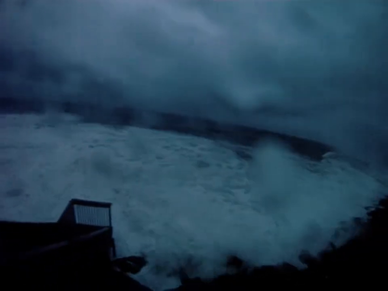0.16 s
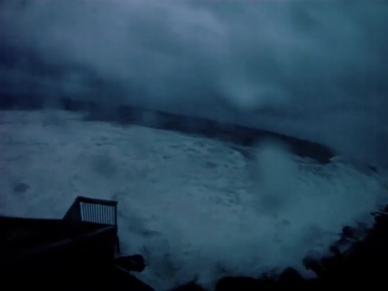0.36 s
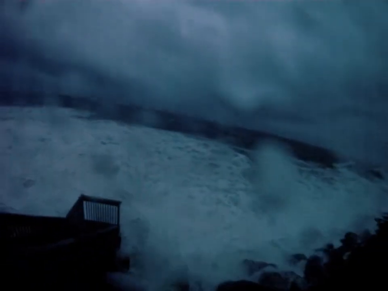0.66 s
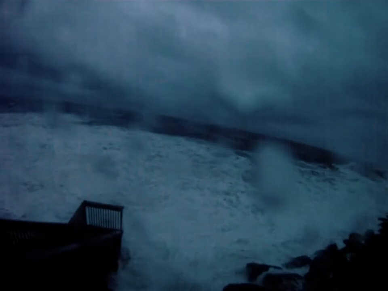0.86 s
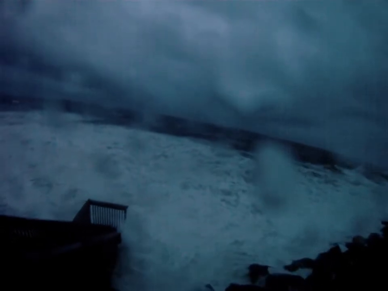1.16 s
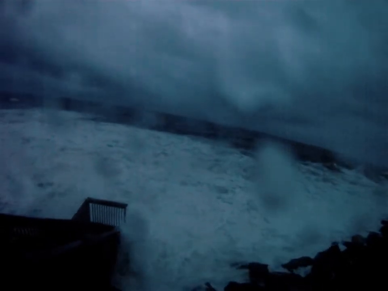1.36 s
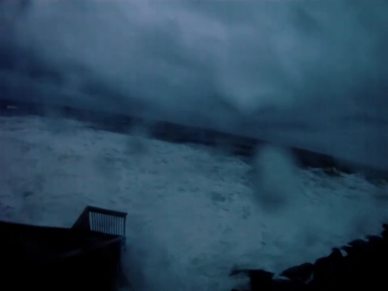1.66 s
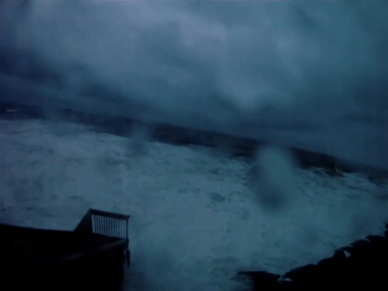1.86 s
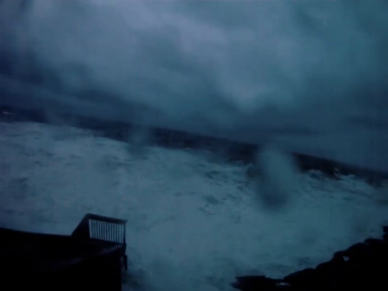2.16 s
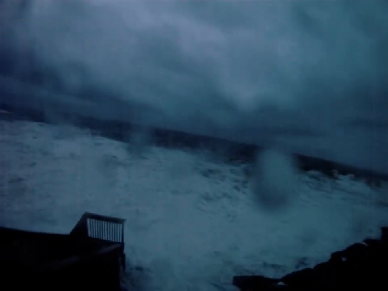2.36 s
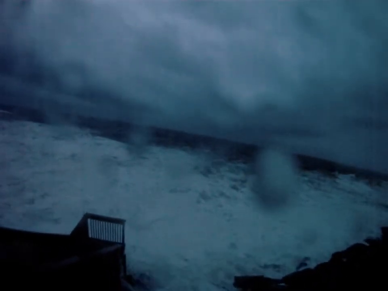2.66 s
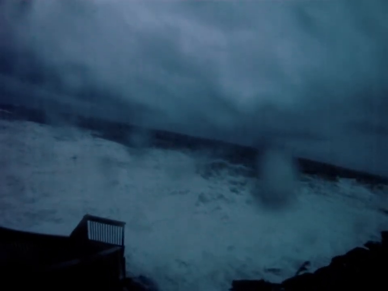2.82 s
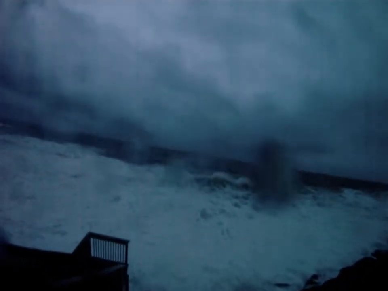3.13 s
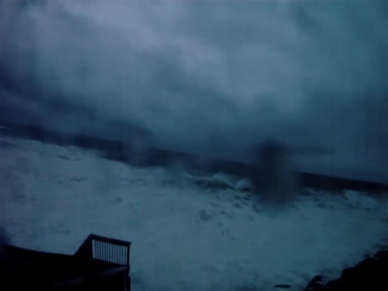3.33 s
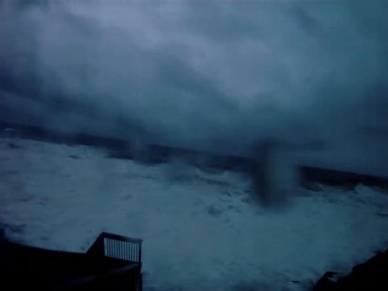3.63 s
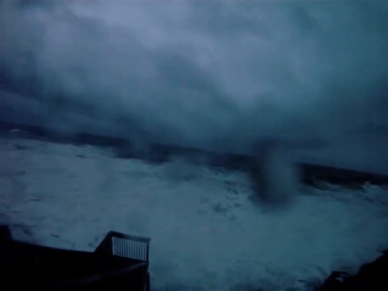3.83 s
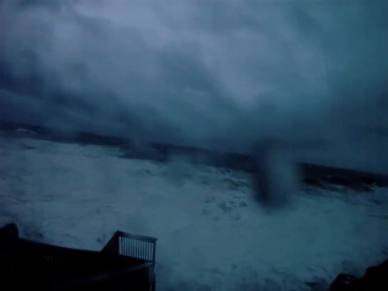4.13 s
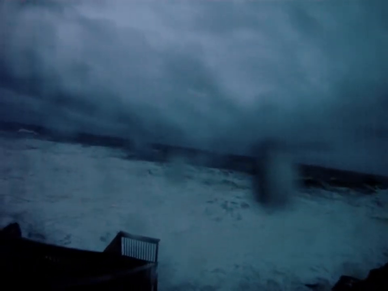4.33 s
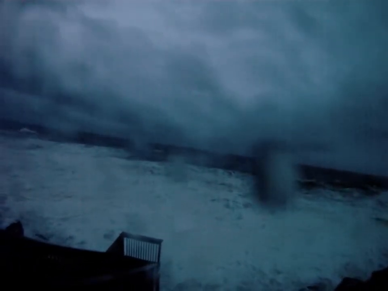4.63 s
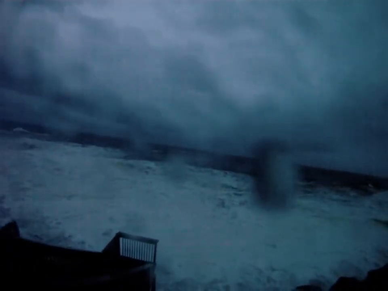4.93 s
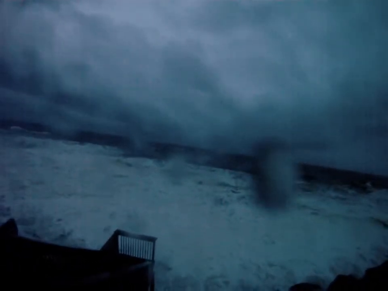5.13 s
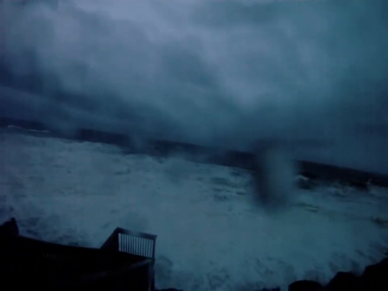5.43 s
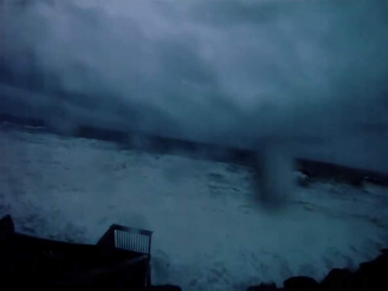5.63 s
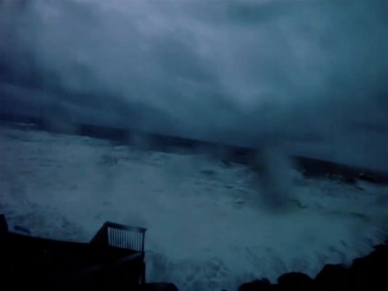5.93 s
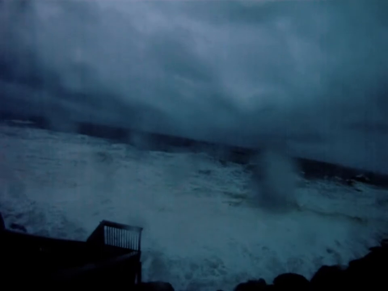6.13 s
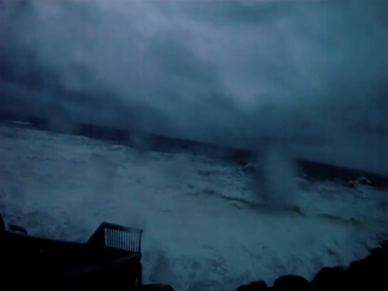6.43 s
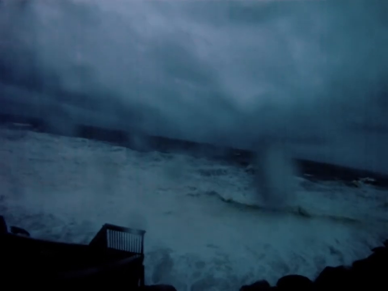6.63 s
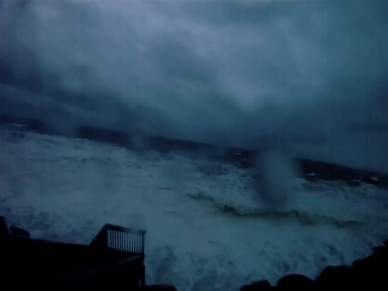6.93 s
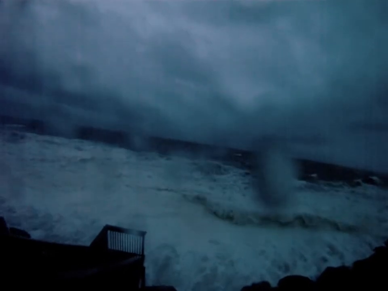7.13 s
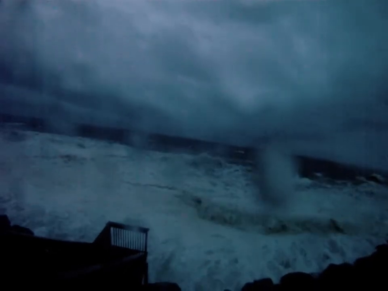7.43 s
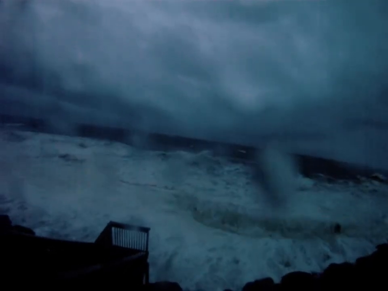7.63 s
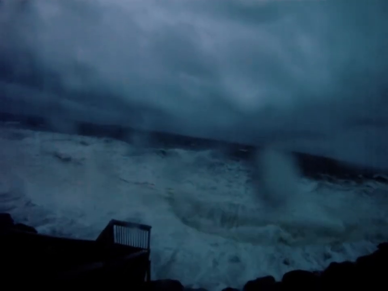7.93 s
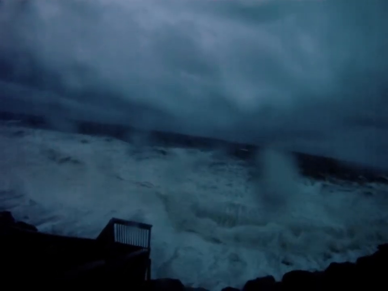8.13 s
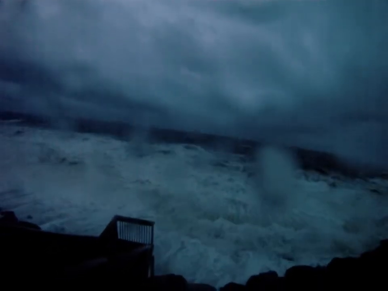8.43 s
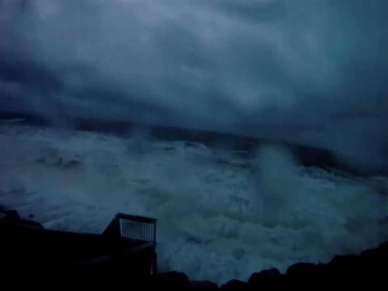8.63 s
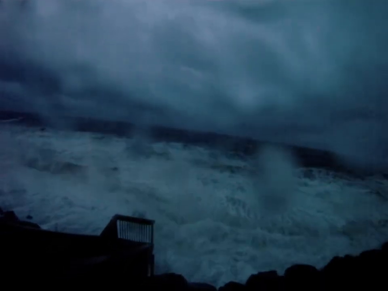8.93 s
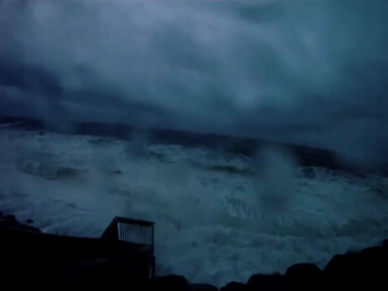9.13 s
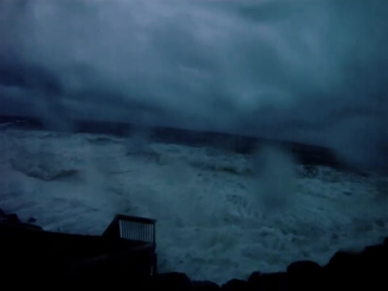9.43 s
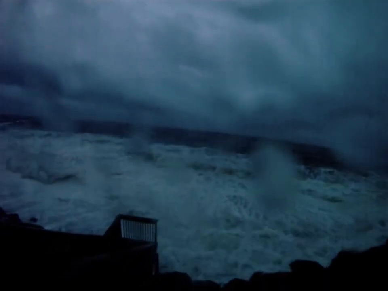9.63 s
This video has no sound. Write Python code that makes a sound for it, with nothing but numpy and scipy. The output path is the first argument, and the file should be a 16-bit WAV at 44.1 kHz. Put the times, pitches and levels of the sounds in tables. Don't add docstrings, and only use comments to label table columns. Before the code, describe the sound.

A stormy sea breaks on a rocky seawall, heard through a small sealed plastic case. A continuous dull water roar, low fluttering wind rumble and steady hissing spray begin fairly strong, ease after about 0.4 seconds, then fluctuate gently. Close drops tick irregularly on the shell throughout, mixing tiny clicks with hard hollow knocks. Strong hits come near 0.3, 1.45 and 1.9 seconds; around 2.3 to 2.9 only faint ticks remain. Knocks return from 3.2, with a heavy double hit near 4.6. The bed dips around 5.3 and swells near 6, with wind thumps around 5.8 to 6. Further knocks land around 6.5 and 7.1, then powerfully near 7.9, 8.2, 8.7, 9.2 and 9.5. Surf and spray surge from about 8.9 and stay stronger to the end. The sound is dry, boxy, nearly mono, with gritty, limited treble and slight overload on heavy drops.

```python
import sys
import numpy as np
from scipy import signal
from scipy.fft import rfft, irfft
from scipy.io import wavfile
from scipy.ndimage import uniform_filter1d, minimum_filter1d

SR = 44100
rng = np.random.default_rng(int(sys.argv[2]) if len(sys.argv) > 2 else 0)


def store_wav(level_fs):
    pcm = np.round(np.clip(np.atleast_2d(level_fs), -1, 1) * 32767)
    wavfile.write(sys.argv[1], SR, pcm.T.astype(np.int16))


def gain_from_db(level_db):
    decades = np.asarray(level_db, float) / 20
    return 10 ** decades


N = 430857

# (time [s], level [dB])
STORM_STRENGTH = [(0.0, -44), (0.25, -45.5), (0.4, -50), (1.5, -47), (1.8, -50.5), (2.6, -50.5), (3.0, -47),
                  (3.5, -50.0), (4.4, -50.5), (4.9, -49.5), (5.3, -53.5), (6.0, -45.5), (6.4, -47),
                  (7.1, -49), (8.2, -47.0), (8.78, -48.5), (8.88, -42.0), (9.77, -44)]
# (time [s], change [dB], spread
# [s])
STORM_SURGES = [(0.74, 4.5, 0.037), (0.87, 2.0, 0.028), (1.0, -3.0, 0.031), (1.22, -2, 0.054),
                (1.63, 0.5, 0.035), (1.75, -2.5, 0.052), (1.91, 4, 0.025), (2.02, -3, 0.018),
                (2.19, -4, 0.031), (2.29, 3, 0.055), (3.3, -2.0, 0.029), (3.68, -2, 0.019),
                (3.92, 1.5, 0.09), (4.41, -2, 0.053), (4.59, -1.5, 0.025), (5.13, -1.5, 0.06),
                (5.29, 1.5, 0.023), (5.9, -3, 0.035), (6.02, 3.5, 0.023), (6.26, -2.5, 0.025),
                (6.85, 1, 0.018), (6.99, -2, 0.048), (7.42, -2.0, 0.015), (7.7, 3.5, 0.022),
                (7.99, -0.5, 0.088), (8.21, 4.5, 0.03), (8.45, -0.5, 0.052), (8.65, 4.5, 0.031),
                (8.89, 3, 0.033), (9.06, -3, 0.025)]
# (time [s], change [dB], spread [s])
WIND_BUFFETS = [(0.34, -3.5, 0.024), (0.61, -2, 0.022), (0.7, 4, 0.018), (1.13, 3.5, 0.059),
                (1.5, 3.0, 0.11), (1.79, -4.0, 0.022), (1.98, 2.5, 0.054), (2.46, -1.5, 0.06),
                (2.8, -3.0, 0.025), (3.61, 2.5, 0.06), (3.89, -3.5, 0.04), (4.09, -3.5, 0.02),
                (5.08, -1.5, 0.09), (5.22, -3, 0.025), (5.78, 5, 0.031), (5.99, 3, 0.045),
                (6.2, 2.5, 0.023), (6.49, -2, 0.1), (6.69, 3.5, 0.023), (6.93, 2.5, 0.044),
                (7.33, 3.5, 0.021), (7.69, 2, 0.021), (7.79, -5.5, 0.036), (7.92, -5, 0.019),
                (8.27, 0, 0.019), (8.54, 2, 0.022), (8.66, -2.5, 0.055), (9.17, -3, 0.18),
                (9.37, -2.5, 0.04), (9.57, 2, 0.04)]
# (frequency [Hz], level [dB])
WIND_COLOUR = [(8.8, -35), (15, -2.5), (80, 1.5), (400, -19), (520, -26.5), (880, -120)]
# (frequency [Hz], level [dB])
SURF_COLOUR = [(150, -1), (250, -3), (400, -6.5), (600, -5.5), (900, -13), (1500, -18), (3000, -17),
               (5500, -19)]
# (frequency [Hz], width [Hz], level [dB])
WALL_MODES = [(1190, 330, -3.5), (2164, 336, -0.5), (2550, 336, -1), (3683, 230, 3.5), (4390, 126, -1),
              (4660, 350, -3.5), (5416, 800, -10.5)]
# (frequency [Hz], width [Hz], level [dB])
DROP_FAMILIES = [
    [(820, 320, -7), (1272, 410, 8)],
    [(2158, 556, 4.5), (2400, 200, -0.5)],
    [(2785, 440, 5), (3330, 140, 1.5)],
    [(3654, 275, 0.5), (4065, 540, -7)],
    [(4640, 180, 2), (5160, 820, -1)],
]
# (frequency [Hz], width [Hz], level [dB])
CASE_THUD = [(251, 310, 2.5), (480, 410, 6)]
# (share of brightness [ratio], share of lean [ratio], offset [dB])
UPPER_RESPONSE = [(.85, 0.84, 0.3), (.85, -0.84, 0.6), (1.3, 0.0018, -1.7)]
# (time [s], main modes [dB], low knock [dB], brightness [dB], lean to upper main modes [dB])
HEAVY_DROPS = [(0.0707,-34.5,-19,3,-4.5),(0.2744,-14.5,-15,-12.5,2),(0.739,-27,-20,5.5,-0.5),(1.4499,-28,-3.5,-25,-5),(1.9281,-18,-14,-3.5,6.5),(3.2138,-25,-20,3,1.5),(3.6435,-35,-3,12,-0.5),(3.8932,-26,-16,-7,-5),(4.1413,-32,-8,-1,-3),(4.568,-17,-13,-9,0),(4.5963,-11.5,-4.5,-23.5,-4),(5.0457,-27.5,-11.5,-15.5,0),(5.2655,-33.0,-19,5.5,1),(5.5652,-27.5,-6.5,-4.5,-6),(5.9584,-20.5,-14,-20.5,-1),(6.465,-26.5,-7,-2.5,0),(7.0187,-33.5,-14,4.5,1),(7.0888,-23.0,-7,-11.5,-2),(7.8755,-13.5,-7.5,-2.5,-2),(8.1984,-18,-4,-5.5,6.5),(8.6635,-21.5,-4.5,-12.0,6),(8.8636,-29,-8,-5,-1),(9.176,-19.5,-21,-26,5),(9.488,-21.5,-1.5,-25,1.0)]
# (time [s], main modes [dB], low knock [dB], brightness [dB])
LID_DROPS = [(0.6697, -34.5, -11, -12), (0.873, -45.0, -8.5, -3), (0.9742, -41.5, 9, -20),
             (1.036, -32.5, -5.0, -20), (1.383, -41.5, -5, -23), (1.7973, -36, -15.0, -10),
             (3.002, -47, 10, -8.0), (3.145, -36, -7, -20), (3.8092, -29, -13, -7),
             (4.1577, -34.0, -2, -16), (4.3523, -41.5, -10.0, -2.5), (4.6933, -50.5, -2, 2),
             (4.7858, -42.5, -8, -2.5), (4.9376, -37.5, -8, -9.5), (5.4618, -39.5, -6, -20.5),
             (5.9302, -33, -15, -12), (6.0246, -40.5, -11, -3), (6.2257, -41.5, -0.5, -7),
             (6.3159, -31, -16.0, -4.5), (6.6055, -49.5, -1.5, 7), (6.642, -32, -14, -2.5),
             (7.3383, -30.0, 0.0, -15), (7.648, -36, -9, -1.0), (8.2348, -29, -5, -8),
             (8.4774, -43, -16, -6), (8.6985, -40, -20, -12), (8.776, -43.5, 6.5, -10),
             (8.844, -40, -3.0, -15), (9.0149, -36, -17, -0.5), (9.3583, -36.0, -4, -8.5)]
# (time [s], main modes [dB], low knock [dB], brightness [dB])
WINDOW_DROPS = [(0.2078, -47.5, 6.5, 0), (0.561, -35.5, -7, -20), (0.8845, -40, -3.5, 0),
                (1.123, -43.5, -12.0, -1.5), (1.577, -44, -13, -4.5), (1.637, -39.5, -3, -4.0),
                (1.8138, -35.5, -2.0, 2), (1.826, -45, -2.0, -11.0), (2.0012, -34.5, -14, -3),
                (2.244, -30, -12, -13.5), (3.081, -31.5, -4.5, -5), (3.1618, -35.0, -3.5, -9.5),
                (3.5806, -46, -9.0, 2.5), (3.7911, -39.5, -5, -3), (4.0143, -37.5, -4.5, -6.5),
                (4.0947, -41.5, -9, -3), (4.2883, -33.5, -4, -4), (5.671, -43.0, 0, -11.5),
                (5.7294, -29.5, -7.5, -5.5), (5.7328, -40.5, -11.5, 4), (6.132, -38.0, -11, -10),
                (6.297, -35.5, -18.0, -13), (6.5282, -43, -7, 2), (7.3089, -42.5, -13.0, -20),
                (7.5682, -37, -6.5, -21), (7.6856, -45, -4, 8.5), (8.104, -38.5, -9, -5.0),
                (8.2913, -30.0, -5.5, -13.5), (8.9755, -27.5, -20.0, -13.5), (9.586, -35, -11, -8)]
# (time [s], main modes [dB], low knock [dB], brightness [dB])
FAINT_DROPS = [(.5846, -45, -2, -14), (.96, -57, -5, 7), (1.104, -44, -12, -9), (2.073, -47, 0, -12),
               (2.324, -45, -12, -6.5), (2.463, -45, -6, -14), (2.82, -52, -9, 4), (2.8758, -44, -3, -16),
               (2.895, -54.5, -6, 5), (3.3951, -41.5, -1, -13), (3.6802, -46, 1, -21),
               (3.7354, -45, 1, -15), (3.828, -45, -14, -14), (4.3154, -42, -14, -18),
               (4.392, -46, -8, -20), (5.0252, -45, -7, -10), (5.3018, -46, -4, -6), (6.9888, -43, -6, -18),
               (8.6864, -54, -6, 8), (9.002, -43, 2, -8)]

LID_LEAN_DB, WINDOW_LEAN_DB = 3, -4
MEAN_STORM_DB = -49
HOLD_HZ = 12000


def evened(x):
    return x / np.sqrt(np.mean(x ** 2) + 1e-20)


def read(points, hz):
    f, value = np.transpose(points)
    return np.interp(np.log(hz + 1), np.log(f + 1), value)


def swells(rows):
    t = np.arange(N) / SR
    return sum(db * np.exp(-.5 * ((t - s) / max(spread, .01)) ** 2) for s, db, spread in rows)


def storm(level_db, share):
    s, db = np.transpose(STORM_STRENGTH)
    strength_db = np.interp(np.arange(N) / SR, s, db) + swells(STORM_SURGES)
    return gain_from_db(level_db + share * (strength_db - MEAN_STORM_DB))


def patchy_noise(gain, size, patchy_db, flicker_db):
    hop = size // 4
    hz = np.fft.rfftfreq(size, 1 / SR)
    a, b, patches = rng.standard_normal((N // hop + 5, len(hz), 3)).T
    flicker = evened(uniform_filter1d(patches[0], size=5))
    patches = uniform_filter1d(patches, size=5, axis=0)
    patches = evened(uniform_filter1d(patches, size=16, axis=1))
    level = gain_from_db(patchy_db * patches + flicker_db * flicker)
    z = (a + 1j * b) * gain(hz)[:, None] * level
    return evened(signal.istft(z, nperseg=size, noverlap=size - hop)[1][:N])


def wind():
    gusts = storm(level_db=-41, share=0.85) * gain_from_db(swells(WIND_BUFFETS))
    return gusts * patchy_noise(lambda hz: gain_from_db(read(WIND_COLOUR, hz)), size=2048, patchy_db=0.76, flicker_db=-0.9)


def surf():
    roar = patchy_noise(lambda hz: gain_from_db(read(SURF_COLOUR, hz)), size=512, patchy_db=3.5, flicker_db=1.5)
    return storm(level_db=-50, share=1) * roar


def housing(hz):
    return sum((-1) ** k * gain_from_db(db) / (1 + 2j * (hz - f) / w) for k, (f, w, db) in enumerate(WALL_MODES))


def spray():
    hz = np.fft.rfftfreq(N, 1 / SR)
    hiss = patchy_noise(lambda hz: abs(housing(hz)), size=256, patchy_db=2.0, flicker_db=0.0)
    lands = rng.random(N) < 300 / SR
    size = rng.exponential(1, N)
    side = rng.choice([-1, 1], N)
    hail = side * gain_from_db(6.3 * np.minimum(size, 4.2)) * lands
    ringing_hail = evened(irfft(rfft(hail) * housing(hz), N))
    both = rfft(hiss + gain_from_db(-11) * ringing_hail)
    low = 1 / (1 + (hz / 3100) ** 12)
    body = storm(level_db=-45.5, share=1.01) * evened(irfft(both * low, N))
    fizz = storm(level_db=-50.5, share=0.95) * evened(irfft(both * (1 - low), N))
    return body + fizz


def drop(levels_db, luck):
    hz = np.fft.rfftfreq(2048, 1 / SR)
    thud_db = 4.0 * (max(levels_db) + 14.0) - 36
    power = 1e-14
    for family, level_db, chance in zip(DROP_FAMILIES + [CASE_THUD], levels_db + [thud_db], luck):
        modes = 0
        for (f, w, db), (spot, detune) in zip(family, chance):
            offset = 2 * (hz - f * (1 + .015 * detune)) / w
            modes = modes + gain_from_db(2 * (db + 3 * spot)) / (1 + offset ** 2) ** 2
        power = power + gain_from_db(2 * level_db) * modes / modes.mean()
    droop = np.sinc(hz / HOLD_HZ).clip(.3)
    cepstrum = irfft(.5 * np.log(280 * power / droop ** 2))
    cepstrum[1:1024] *= 2
    blow = np.exp(rfft(cepstrum[:1025], 2048))
    far = np.clip((levels_db[1] - levels_db[4] + 8) / 20, .1, 1)
    lag = sum(np.arctan((hz - family[0][0]) / (350 + 90 * k)) for k, family in enumerate(DROP_FAMILIES))
    return irfft(blow * np.exp(-2j * far * (lag - lag[0])))[:1500]


def drops():
    out = np.zeros(N)
    rows = list(HEAVY_DROPS)
    for table, lean_db in [(LID_DROPS, LID_LEAN_DB), (WINDOW_DROPS, WINDOW_LEAN_DB), (FAINT_DROPS, 0)]:
        rows += [(*row, lean_db) for row in table]
    luck = rng.standard_normal((len(rows), 6, 2, 2))
    for (s, main_db, knock_db, bright_db, lean_db), chance in zip(rows, luck):
        upper_db = [main_db + a * bright_db + b * lean_db + db for a, b, db in UPPER_RESPONSE]
        sound = drop([main_db + knock_db, main_db, *upper_db], chance)
        part = out[round((s - .0003) * SR):][:len(sound)]
        part += sound[:len(part)]
    return out


def scene():
    return np.tile(wind() + surf() + spray() + drops(), (2, 1))


def held_samples(x):
    hz = np.fft.rfftfreq(N, 1 / SR)
    z = rfft(x) / (1 + (hz / 5870) ** 50)
    fold = round(HOLD_HZ * N / SR)
    z[:fold + 1] += np.conj(z[fold::-1])
    return irfft(z * np.sinc(hz / HOLD_HZ) / (1 + (hz / 11960) ** 60), N)


def smeared(x, size, noise_db):
    z = signal.stft(x, nperseg=size)[2]
    a, b = rng.standard_normal((z.shape[1], z.shape[0], 2)).T
    level = uniform_filter1d(abs(z), size=7, axis=0)
    return signal.istft(z + gain_from_db(noise_db) * level * (a + 1j * b), nperseg=size)[1][:N]


def starved(x, quiet_db, thrift_db, lag_s, spread_s):
    hz, t, z = signal.stft(x, SR, "cosine", nperseg=2048)
    band_power = (abs(z[:1024].reshape(128, 8, -1)) ** 2).mean(1)
    bands_db = 10 * np.log10(band_power + 1e-20)
    hiss_db = bands_db[8:60].mean(0)
    floor_db = minimum_filter1d(uniform_filter1d(hiss_db, size=3), size=9)
    cost = np.maximum(hiss_db - floor_db - 11, 0)
    payback = np.exp(-.5 * ((t[:30] - lag_s) / spread_s) ** 2)
    debt = np.convolve(cost, payback)[:len(t)]
    limit_db = np.median(bands_db[8:60]) + quiet_db + thrift_db * np.tanh(debt / 35)
    limit_db += .6 * (minimum_filter1d(hiss_db, size=5) - np.median(hiss_db) + 2.5)
    keep = np.repeat(bands_db > limit_db, 8, axis=0)
    keep &= abs(z[:1024]) > gain_from_db(limit_db - 3.5)
    return signal.istft(z * np.vstack([keep, keep[-1:]]), SR, "cosine", nperseg=2048)[1][:N]


def top_cut(x):
    return signal.sosfilt(signal.butter(12, 11330, fs=SR, output="sos"), x)


def record(dry):
    hz = np.fft.rfftfreq(N, 1 / SR)
    driven = np.clip(dry[0], -1.08, 1.08)
    blocks = smeared(held_samples(driven), size=640, noise_db=-20)
    thinned = starved(blocks, quiet_db=-15.5, thrift_db=11, lag_s=0.23, spread_s=0.051)
    loud = irfft(rfft(np.clip(thinned, -1, 1)) / (1 + (hz / 15800) ** 80), N)
    apart = smeared(loud, size=256, noise_db=-37) - loud
    apart *= uniform_filter1d(abs(loud), size=512) > .05
    return top_cut(loud + apart * [[1], [-1]])


dry = scene()
out = record(dry)
store_wav(out)
```